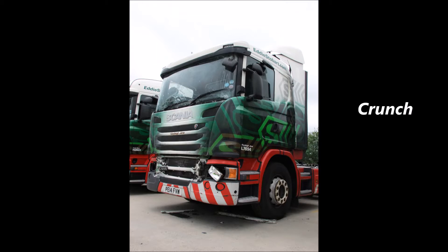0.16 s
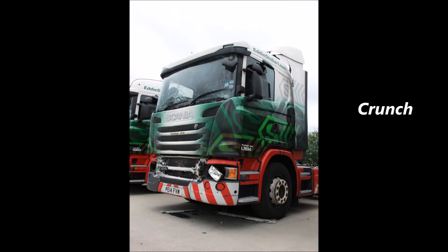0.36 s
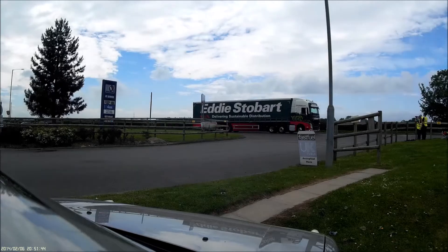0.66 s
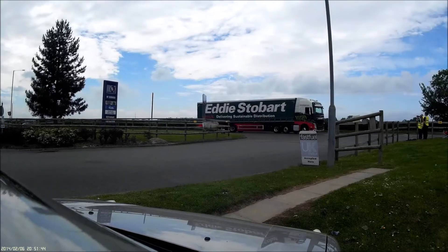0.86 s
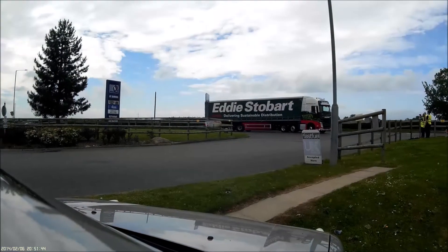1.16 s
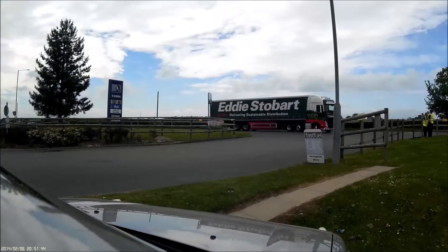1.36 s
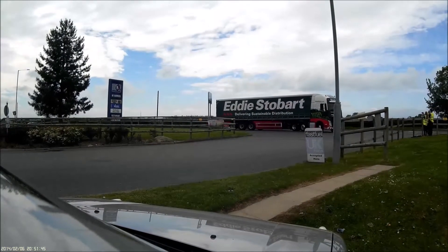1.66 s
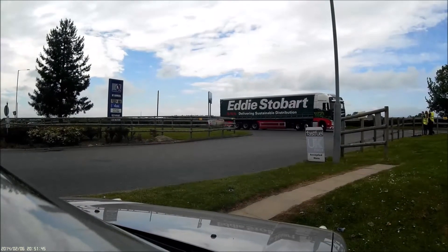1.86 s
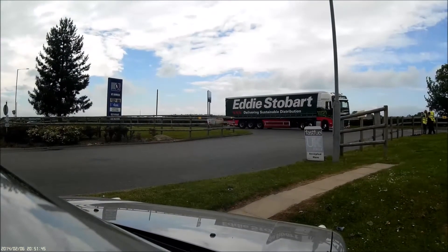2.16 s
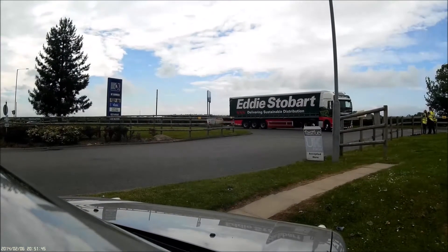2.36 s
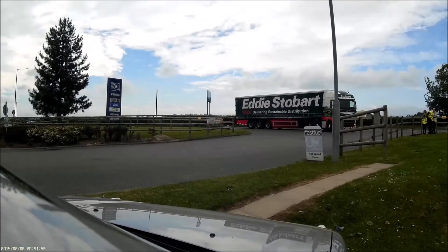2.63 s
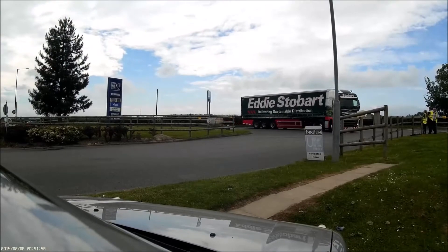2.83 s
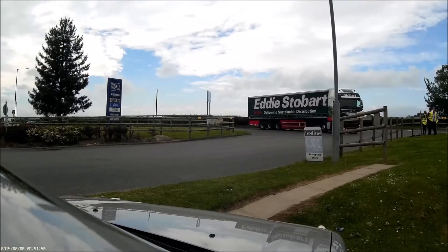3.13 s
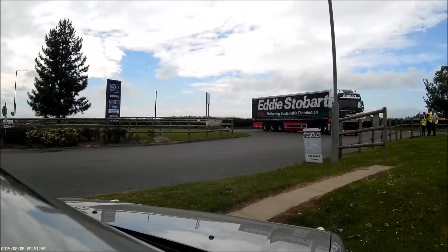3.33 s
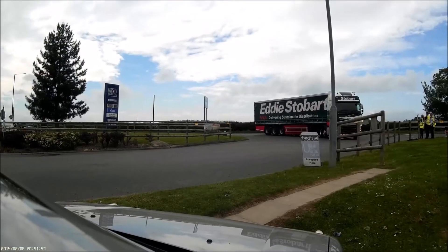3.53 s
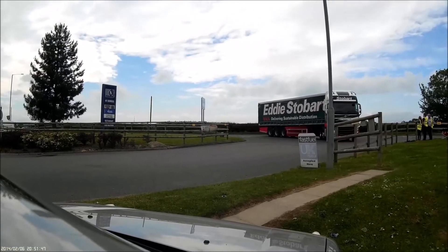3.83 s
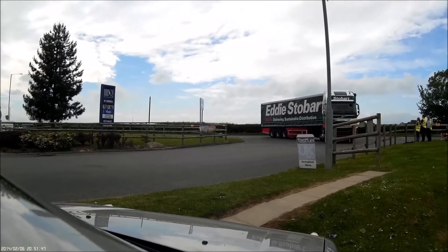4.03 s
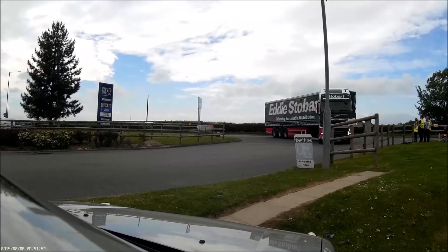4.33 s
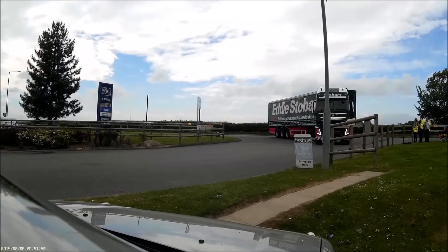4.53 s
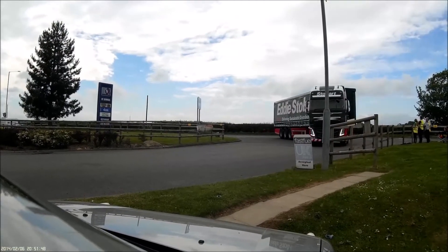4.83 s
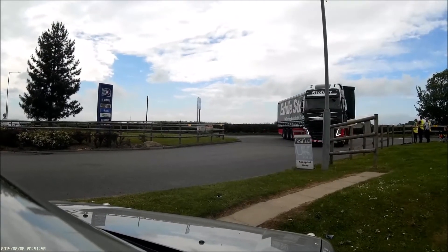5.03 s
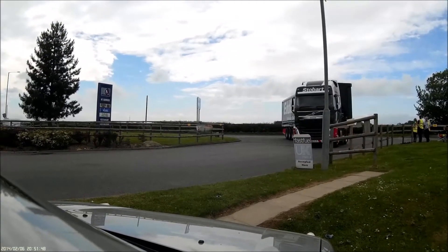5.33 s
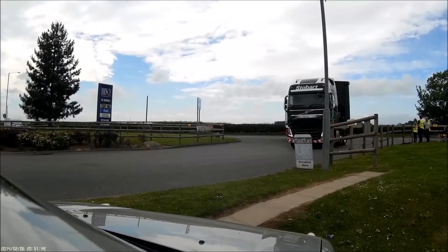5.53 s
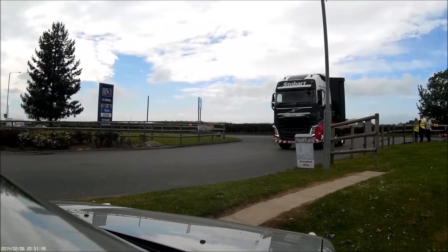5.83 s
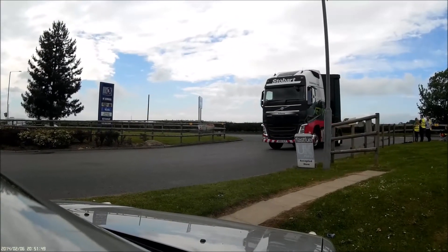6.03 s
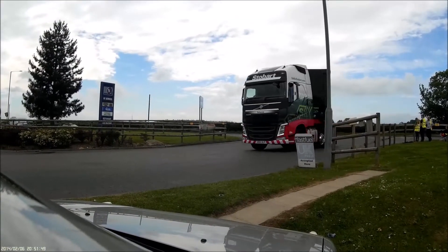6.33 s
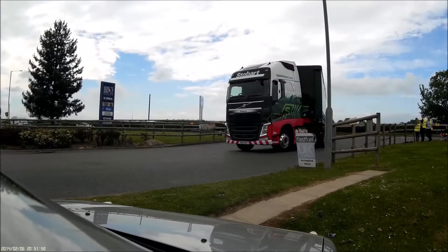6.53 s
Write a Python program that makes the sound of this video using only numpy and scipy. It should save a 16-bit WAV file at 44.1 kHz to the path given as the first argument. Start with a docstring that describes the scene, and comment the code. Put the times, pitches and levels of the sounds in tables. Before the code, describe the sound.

Silence, then a sudden steady roar of a lorry turning and approaching, with faint hiss and whines, one tick, and dull gusty microphone bumps.

```python
"""After a silence the sound starts abruptly: a lorry turns off a road and rolls towards a parked car with a
small camera at its window. Filtered noise makes its tyre and engine roar and its hiss; sines blended with
narrow noise make the exhaust drone and thin whines, then the turbo whistle and the gear whine.
A breeze of slow and fast eddies gathers gusts on the microphone; one tick follows, then low thuds of wind
as shaped noise bursts. The exhaust drone returns and the roar is loudest as the lorry nears."""
import sys
import numpy as np
from scipy import signal
from scipy.io import wavfile
from scipy.ndimage import uniform_filter1d, minimum_filter1d

SR = 44100
rng = np.random.default_rng(int(sys.argv[2]) if len(sys.argv) > 2 else 0)


def gain_from_db(level_db):
    """Convert decibel levels to linear amplitude factors (20 dB per decade)."""
    decades = np.asarray(level_db, float) / 20
    return 10 ** decades


def output_pcm(signal):
    """Save a mono or channel-first signal as 16-bit PCM at the path in sys.argv[1].

    Samples are clipped to [-1, 1] before scaling.
    """
    pcm = np.clip(np.atleast_2d(signal).T, -1, 1) * 32767
    wavfile.write(sys.argv[1], SR, np.round(pcm).astype(np.int16))


N = 294588

# The lorry's approach. Each row: time in seconds, loudness in dB as distance and throttle change,
# how far the cab faces the car (0-1).
LORRY = [(.62, -18.5, 0.04), (.92, -19.5, 0.36), (1.5, -19, .2), (1.85, -18, 0.4), (2.15, -17.5, 0.29),
         (2.9, -16.5, 0.27), (3.2, -16.5, .3), (3.57, -17, 0.42), (3.88, -17, 0.46), (3.95, -18, 0.2),
         (4.16, -20.5, 0.62), (4.33, -17.5, 0.56), (4.62, -17.5, 0.13), (5.1, -17.5, 0.03),
         (5.58, -16.5, 0.08), (5.85, -15, 0.22), (6.3, -16.5, 0.92), (6.68, -14, 0.8)]


def evened(x):
    """Scales to rms 1."""
    return x / np.sqrt(np.mean(x ** 2) + 1e-20)


def read(points, hz):
    """Reads a spectrum on a log-frequency axis."""
    f, value = np.transpose(points)
    return np.interp(np.log(hz + 1), np.log(f + 1), value)


def columns(rows, t):
    """Joins curve rows by straight lines at times t."""
    s, *rest = np.transpose(rows)
    return [np.interp(t, s, c) for c in rest]


def span(rows):
    """Sample times from the first row of a curve to its last."""
    return np.arange(rows[0][0], rows[-1][0], 1 / SR)


def add(mix, s, sound):
    """Mixes a sound in at s seconds."""
    part = mix[round(s * SR):][:len(sound)]
    part += sound[:len(part)]


def swells(rows, t):
    """Power of bell-shaped swells, rows of (middle s, half length s, dB)."""
    return sum(gain_from_db(2 * db) * np.exp(-((t - s) / half) ** 2) for s, half, db in rows)


def wander(size):
    """Slow random drift of rms 1, changing over about size samples."""
    return evened(uniform_filter1d(uniform_filter1d(rng.standard_normal(N), size=size), size=size))


def resonate(x, hz, width_hz):
    """Band-pass on a moving pitch: shifts the curve hz down to zero, smooths twice, and shifts back."""
    turn = np.exp(2j * np.pi * np.cumsum(hz * np.ones(len(x))) / SR)
    r = np.exp(-np.pi * width_hz / SR)
    low = x / turn
    for _ in range(2):
        low = signal.lfilter([1 - r], [1, -r], low)
    return 2 * (turn * low).real


def noise(field_db, size, patchy_db, flicker_db):
    """Random short-time spectra shaped by field_db(t, hz), with drifting patches and a shared flicker."""
    hop = size // 4
    frames, hz = N // hop + 5, np.fft.rfftfreq(size, 1 / SR)
    a, b, patches = rng.standard_normal((frames, len(hz), 3)).T
    patches = evened(uniform_filter1d(uniform_filter1d(patches, size=10, axis=0), size=16, axis=1))
    flicker = evened(uniform_filter1d(rng.standard_normal(frames), size=5))
    db = field_db(np.arange(frames) * hop / SR, hz[:, None])
    db = db + patchy_db * patches + flicker_db * flicker
    return signal.istft((a + 1j * b) * gain_from_db(db), nperseg=size, noverlap=size - hop)[1][:N]


def tone(t, hz, db, width_hz, clean):
    """A sine blended with a fuzzy band of noise on the same pitch, fading in and out."""
    sine = np.sqrt(2) * np.sin(2 * np.pi * np.cumsum(hz) / SR)
    fuzz = evened(resonate(rng.standard_normal(len(t)), hz, width_hz))
    blend = clean * sine + np.sqrt(1 - clean ** 2) * fuzz
    return gain_from_db(db) * blend * signal.windows.tukey(len(t), .15)


def tread_hum(t):
    """Tyre tread: a band of noise that swells and comes in short uneven bursts."""
    # Each row: middle in seconds, half length in seconds, level in dB against the broad roar.
    hum_swells = [(1.1, 0.18, -4), (1.45, 0.13, -1.5), (1.8, .15, 0), (2.3, 0.12, -9.5), (3.8, 0.32, -1),
                  (6.52, 0.12, -3.5)]
    between_db, rough_db = -14.5, 1.6  # level between swells, against the roar; rms of the unevenness
    hum = evened(resonate(rng.standard_normal(N), 1197, width_hz=484))
    hum *= np.sqrt(gain_from_db(2 * between_db) + swells(hum_swells, t))
    return hum * gain_from_db(rough_db * wander(size=500))


def body_rings(t):
    """Hollows of body and exhaust ringing as drifting, swelling bands of noise."""
    # Each row: pitch in Hz, width in Hz, strength in dB ahead of the swells.
    hollows = [(596, 122, -9), (935.8, 87, -2)]
    # Each row: middle in seconds, half length in seconds, gain in dB on those strengths.
    ring_swells = [(1.9, 0.11, -19), (2.35, 0.51, -12), (3.1, .2, -5), (3.8, 0.5, -4.5), (4.8, 0.38, -5),
                   (5.95, 0.15, -7), (6.35, 0.11, -2)]
    between_db, wander_db = -9, 2  # gain between swells; rms of its wandering
    drift = 1 + .015 * evened(uniform_filter1d(rng.standard_normal(N), size=20000))
    rings = np.zeros(N)
    for hz, width_hz, db in hollows:
        rings += gain_from_db(db) * evened(resonate(rng.standard_normal(N), hz * drift, width_hz))
    rings *= np.sqrt(gain_from_db(2 * between_db) + swells(ring_swells, t))
    return rings * gain_from_db(wander_db * wander(size=2500))


def roar():
    """Tyres and engine block: broad noise, its upper part rising when the cab faces the car."""
    # Spectrum ahead of the cab's turning. Each row: frequency in Hz, relative density in dB per Hz.
    spectrum = [(20, -23), (54, 4.5), (90, -16), (221, -14.5), (341, -5.5), (475, -4), (590, -1.5),
                (760, -1.5), (1120, 0), (1650, -3.5), (1950, -14), (2200, -10.5), (2880, -14.5),
                (3350, -24), (3500, -36), (3700, -46), (8000, -100)]
    facing_db = 7  # what the cab's front adds to the upper roar

    def field_db(t, hz):
        upper = np.clip(np.log2(hz / 1880 + 1e-9) * 6, 0, 1)
        return read(spectrum, hz) + upper * (facing_db * columns(LORRY, t)[1] - 3)

    t = np.arange(N) / SR
    broad = evened(noise(field_db, size=1024, patchy_db=0.5, flicker_db=0.79))
    return gain_from_db(columns(LORRY, t)[0]) * (broad + tread_hum(t) + body_rings(t))


def rattle(t):
    """Tiny bright ticks at random moments: 4 ms noise decays through a treble resonance."""
    per_s = 6
    sizes = gain_from_db(4.0 * np.minimum(rng.exponential(1, N), 4))
    hits = sizes * (rng.random(N) < per_s / SR)
    bursts = signal.oaconvolve(hits, np.exp(-t[:800] / .004))[:N] * rng.standard_normal(N)
    return gain_from_db(-2) * resonate(bursts, 12300, width_hz=2500)


def hiss():
    """Smooth fan and injector hiss, throbbing a little with the diesel knock."""
    # Spectrum with ripples from the camera case. Each row: frequency in Hz, relative density in dB per Hz.
    spectrum = [(2800, -25), (3500, 1), (4000, -1), (4900, 1.5), (5200, -5.5), (5900, -1), (7150, -10.5),
                (7700, -4.5), (8600, -17.5), (9450, -6.5), (10100, -17.5), (10600, -13.5), (11200, -22),
                (11800, -9), (13000, -18), (13600, -23), (14900, -24), (15800, -35)]
    # Each row: time in seconds, dB more hiss as the engine works.
    throttle = [(.62, -2.5), (.95, 1), (1.4, 0.5), (1.8, -1.5), (2.5, -0.2), (3.2, 1), (4.2, -0.5),
                (4.65, -2.5), (5.5, -1), (6.68, -1)]
    under_roar_db, toward_db = -29.5, 3  # base level; what a cab facing the car adds
    tilt_db, knocks_per_s = 2, 24.5  # tilt per octave, times how far the cab faces the car beyond 0.3

    def field_db(t, hz):
        tilt = tilt_db * (columns(LORRY, t)[1] - .3) * np.log2(hz / 4500 + .01)
        return read(spectrum, hz) + tilt

    t = np.arange(N) / SR
    wobble = evened(uniform_filter1d(rng.standard_normal(N), size=8000))
    phase = np.cumsum(knocks_per_s * (1 + .02 * wobble)) / SR % 1
    knock = 1 + .22 * np.exp(-phase / .2)
    air = noise(field_db, size=512, patchy_db=1.3, flicker_db=.7)
    lorry_db, facing = columns(LORRY, t)
    level_db = lorry_db + under_roar_db + toward_db * facing + columns(throttle, t)[0]
    return gain_from_db(level_db) * (evened(air * knock) + rattle(t))


def exhaust():
    """Exhaust drone: a nearly pure low tone following the engine, in two stretches."""
    # One table a stretch. Each row: time in seconds, pitch in Hz, level in dB.
    stretches = [
        [(.62, 41.5, -31), (.8, 43, -33), (.93, 46.4, -27), (1.1, 47.7, -29), (1.25, 47.7, -29),
         (1.43, 47.8, -30), (1.6, 45, -40)],
        [(4.3, 47.7, -33), (4.6, 47.7, -33), (4.9, 47.7, -33), (5.15, 50, -33), (5.4, 50.7, -33),
         (5.9, 55, -33), (6.3, 53, -35), (6.68, 50, -35)],
    ]
    out = np.zeros(N)
    for rows in stretches:
        t = span(rows)
        add(out, t[0], tone(t, *columns(rows, t), width_hz=6, clean=.93))
    return out


def eddies(low_hz, top_hz):
    """Turbulence, flat between two corners and steep outside; its slow level is left to the gusts."""
    def field_db(t, hz):
        rise = (hz / low_hz) ** 3
        return 10 * np.log10(rise / (1 + rise) / (1 + (hz / top_hz) ** 5) + 1e-14) + 0 * t

    air = noise(field_db, size=2048, patchy_db=1.0, flicker_db=4.5)
    slow_power = uniform_filter1d(uniform_filter1d(air ** 2, size=2000), size=2000)
    return air / np.sqrt(slow_power + 1e-20)


def breeze():
    """A wandering breeze and its gusts drive slow and fast eddies on the microphone."""
    # Each row: time in seconds, level in dB, lean in dB (added to fast eddies, taken from slow ones).
    steady = [(.62, -39, 0.5), (1.2, -39.5, 1.5), (1.6, -33, 6), (2.45, -31.5, 4), (2.9, -25, -2.5),
              (3.7, -32, 1.), (3.9, -33, -3), (4.25, -36, -2.), (4.4, -35, 6), (5.3, -30.5, -4),
              (6.1, -28.5, -0.5), (6.68, -30, 0.)]
    # Each row: middle in seconds, half length in seconds, strength in dB, lean in dB as above.
    gusts = [(2.68, 0.031, -22, -3), (2.795, 0.046, -21, 0), (3.107, 0.049, -22.5, 1),
             (3.22, 0.034, -20.5, 2), (3.556, 0.056, -21.5, -3.5), (3.674, 0.047, -20, 3),
             (3.777, 0.026, -23, -2), (4.33, .03, -19, -1), (4.452, 0.041, -15.5, 2.5),
             (4.576, 0.038, -22.5, -1.5), (4.668, 0.012, -23.5, 5.5), (4.76, 0.057, -22, -2.5),
             (4.97, 0.036, -28, -8), (5.037, 0.044, -27.5, 10.5), (5.13, 0.033, -23, -0.5),
             (5.223, 0.012, -20, 4.5), (5.414, 0.028, -17.5, 1), (5.514, .04, -18.5, 4.5),
             (5.576, 0.054, -25, -6.5), (5.804, 0.041, -18.5, 3), (6.153, 0.026, -26.5, -8.5),
             (6.266, .02, -27, 3), (6.335, .06, -27.5, -7.5), (6.545, 0.012, -15, 1.5),
             (6.63, 0.034, -22, 7)]
    t = np.arange(N) / SR
    out = np.zeros(N)
    level_db, lean_db = columns(steady, t)
    for low_hz, top_hz, sign in ((12, 122, -1), (112, 365, 1)):  # slow rumble, then fast flutter
        breeze_db = level_db + sign * lean_db + 2 * wander(size=1500)
        leaning = [(s, half, db + sign * gust_lean_db) for s, half, db, gust_lean_db in gusts]
        out += np.sqrt(gain_from_db(2 * breeze_db) + swells(leaning, t)) * eddies(low_hz, top_hz)
    return out


def whines():
    """Short thin whines: gliding half-fuzzy tones, each swelling and fading once."""
    # Each row: start in seconds, length in seconds, start pitch in Hz, glide in Hz, level in dB at the top.
    rows = [(.75, .5, 2960, 60, -42), (.75, .4, 10550, 30, -66), (1.55, .6, 3500, 290, -56),
            (5.45, .65, 3290, 100, -47), (5.8, 1., 3400, -8, -43), (6.4, .5, 3480, 40, -51),
            (6., .9, 6045, 40, -51.5), (6.15, .7, 7700, 0, -61), (.75, .8, 575, 10, -33.5),
            (5.6, .7, 520, 10, -26), (6.35, .45, 1410, 30, -24), (6.2, .25, 1220, 10, -26),
            (2.55, .35, 1570, 10, -29), (1.15, .3, 11680, 20, -68)]
    out = np.zeros(N)
    for s, length, hz, glide_hz, db in rows:
        t = np.arange(0, length, 1 / SR)
        swell = np.sin(np.linspace(0, np.pi, len(t)))
        width_hz = .65 * np.sqrt(hz)
        add(out, s, swell * tone(t, hz + glide_hz * t / length, db, width_hz, clean=.58))
    return out


def turbo():
    """Turbo whistle: a mostly fuzzy high tone whose pitch rises and sinks."""
    # Each row: time in seconds, pitch in Hz, level in dB.
    rows = [(1.5, 6900, -71), (2, 7650, -67), (2.4, 8250, -63), (2.8, 8650, -67), (3.1, 8600, -75),
            (3.4, 8150, -65), (3.7, 7600, -61), (4.05, 7480, -63)]
    t = span(rows)
    out = np.zeros(N)
    add(out, t[0], tone(t, *columns(rows, t), width_hz=80, clean=.35))
    return out


def gears():
    """Gear whine: a tone at the rate of the meshing teeth and a fuzzier one at its fifth multiple."""
    # Each row: time in seconds, tooth rate in Hz, its level in dB, level of the fifth multiple in dB.
    rows = [(1.7, 490, -38, -48), (1.88, 510, -29.5, -45), (2.2, 556, -28, -41), (2.5, 592, -27.5, -42),
            (2.7, 612, -32, -46), (3.05, 657, -33, -46), (3.4, 660, -42, -47), (3.6, 658, -44, -45),
            (3.9, 657, -46, -54)]
    t = span(rows)
    hz, db, fifth_db = columns(rows, t)
    teeth = tone(t, hz, db, width_hz=16, clean=.72)
    fifth = tone(t, 5 * hz, fifth_db, width_hz=45, clean=.4)
    out = np.zeros(N)
    add(out, t[0], teeth + fifth)
    return out


def tick():
    """A lone tick: a sine with a fast onset that dies away exponentially."""
    # Each row: start in seconds, strength in dB ahead of the onset, pitch in Hz, time to fall 60 dB in seconds.
    rows = [(3.5497, 4, 1030, .012)]
    out = np.zeros(N)
    t = np.arange(2000) / SR
    for s, db, hz, t60 in rows:
        onset = 1 - np.exp(-t / .0004)
        add(out, s, gain_from_db(db - 60 * t / t60) * np.sin(2 * np.pi * hz * t) * onset)
    return out


def buffets():
    """Single thuds of wind on the microphone: short bell-shaped bursts of low noise."""
    # Each row: time in seconds (the burst starts 4 ms sooner), strength in dB (the peak lies 5.5 dB lower),
    # centre in Hz, length in seconds (200 samples at least).
    rows = [(3.644, 1, 185, 0.062), (3.693, -4, 300, 0.025), (4.316, -8, 66.6, 0.023),
            (4.43, 8.5, 356, 0.037), (4.452, -15, 254, 0.041), (5.41, -7, 180, 0.025),
            (5.491, 2, 280, 0.019), (5.521, 2, 264, 0.04), (5.78, 2, 192, 0.022), (5.792, 1, 126.6, 0.03),
            (6.131, -13, 60.4, 0.03), (6.248, -0.5, 100, 0.019), (6.532, -5, 201, 0.021),
            (6.607, 4, 238, 0.015), (6.644, -0.5, 235, 0.038)]
    out = np.zeros(N)
    for s, db, hz, length in rows:
        size = max(round(length * SR), 200)
        puff = resonate(rng.standard_normal(6000), hz, width_hz=.9 * hz)
        puff = puff[2000:][:size]  # past the filter's build-up
        puff = puff * np.hanning(len(puff))
        add(out, s - .004, gain_from_db(db - 5.5) * puff / abs(puff).max())
    return out


def scene():
    """Lorry and wind together, let in abruptly after a silence."""
    start_s, fade_s = .6136, .0008
    on = np.clip((np.arange(N) / SR - start_s) / fade_s, 0, 1)
    lorry = roar() + hiss() + exhaust() + whines() + turbo() + gears()
    wind = breeze() + buffets()
    return ((lorry + wind + tick()) * on)[None]


def low_pass(x):
    """Removes everything above the highest recorded frequency."""
    return signal.sosfilt(signal.butter(12, 15720, fs=SR, output="sos"), x)


def record(dry):
    """A fast limiter holds the loudest thuds under the ceiling."""
    ceiling = .96
    gain = minimum_filter1d(ceiling / np.maximum(abs(dry), ceiling), size=160)
    limited = dry * uniform_filter1d(gain, size=160)
    return low_pass(limited)


dry = scene()
out = record(dry)
output_pcm(out)
```